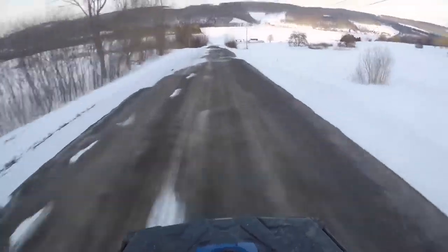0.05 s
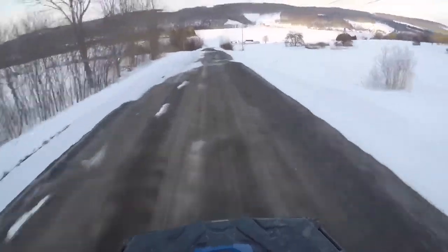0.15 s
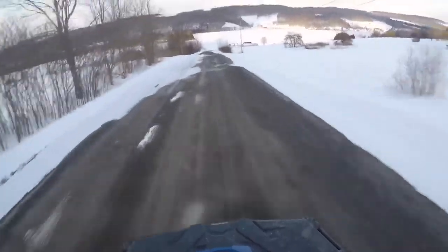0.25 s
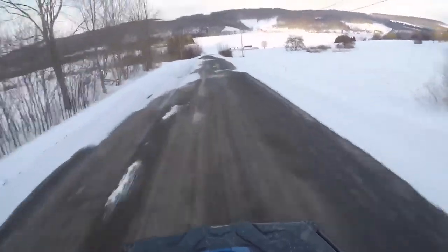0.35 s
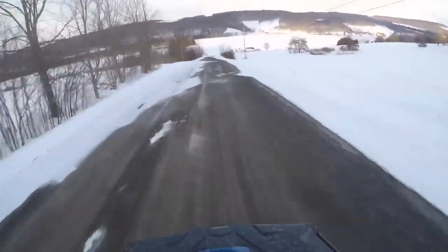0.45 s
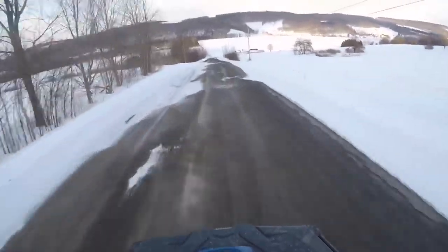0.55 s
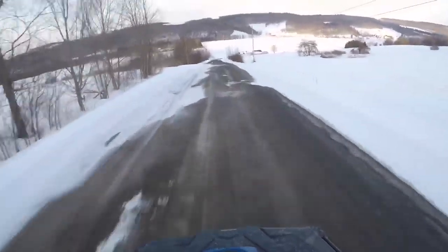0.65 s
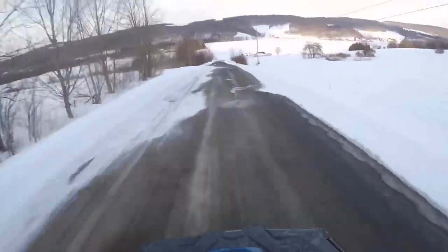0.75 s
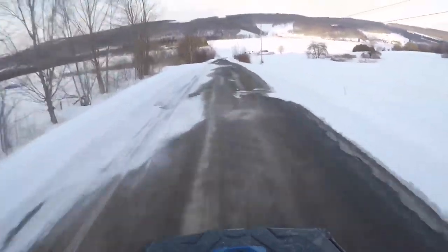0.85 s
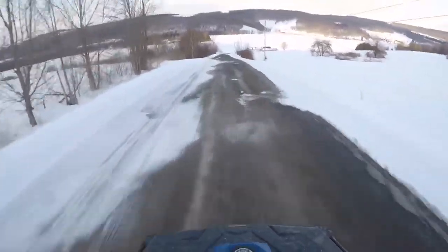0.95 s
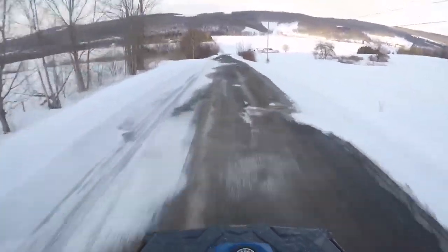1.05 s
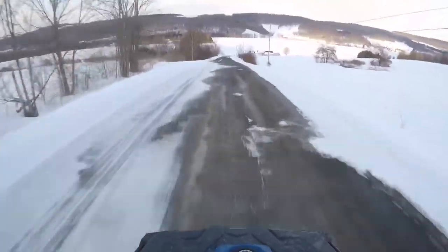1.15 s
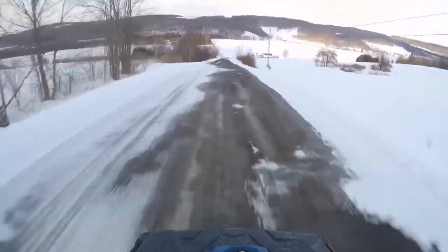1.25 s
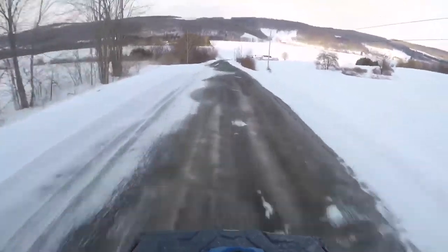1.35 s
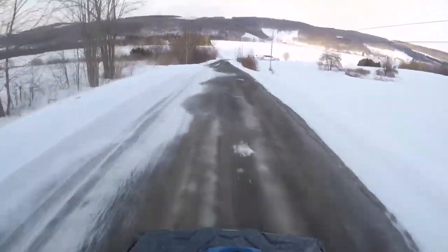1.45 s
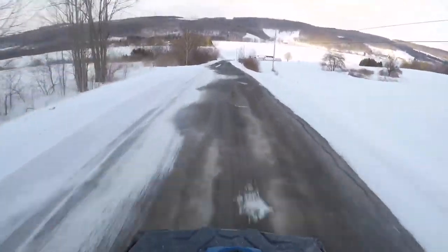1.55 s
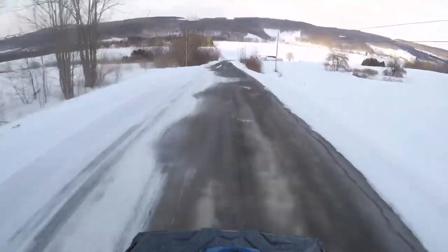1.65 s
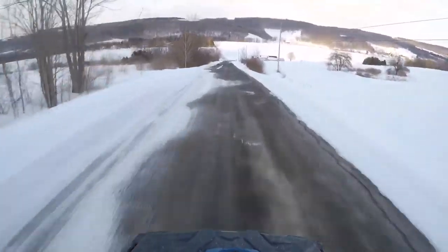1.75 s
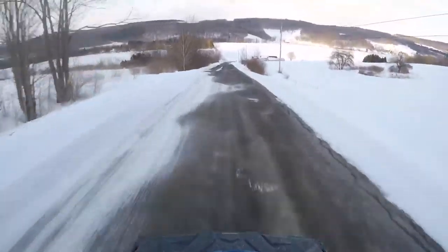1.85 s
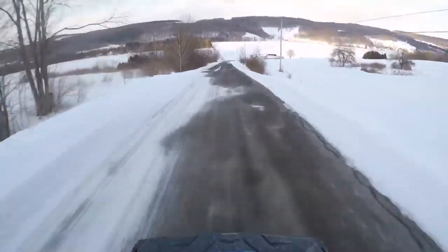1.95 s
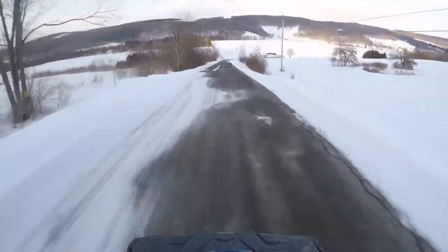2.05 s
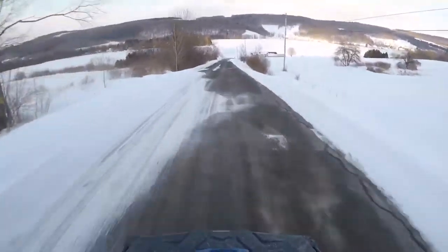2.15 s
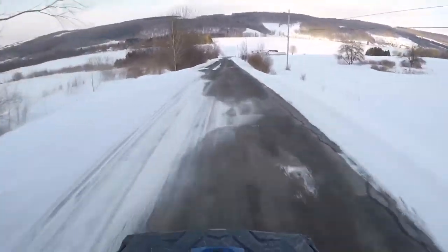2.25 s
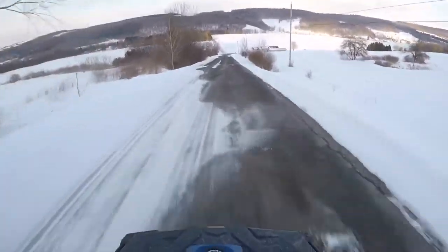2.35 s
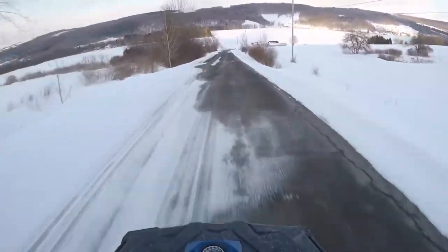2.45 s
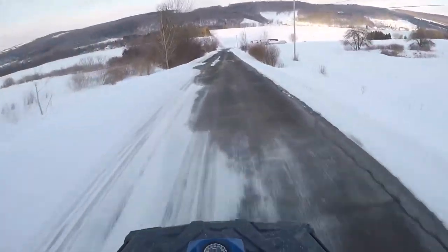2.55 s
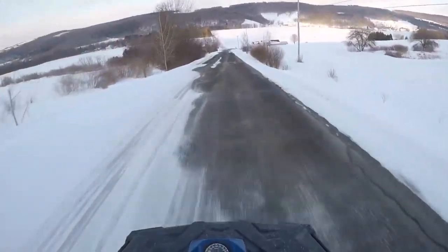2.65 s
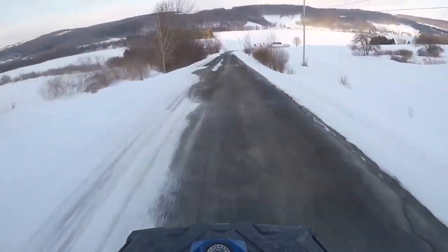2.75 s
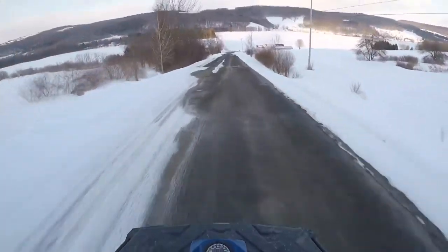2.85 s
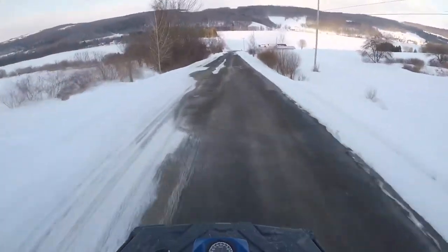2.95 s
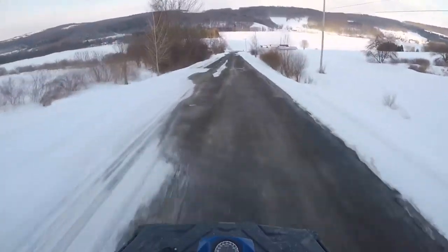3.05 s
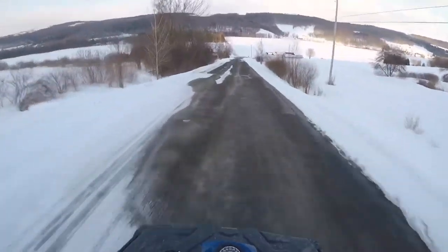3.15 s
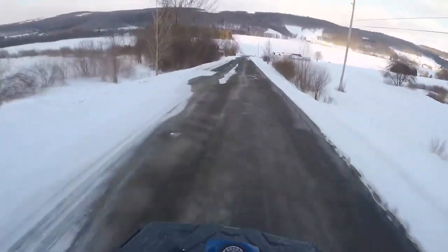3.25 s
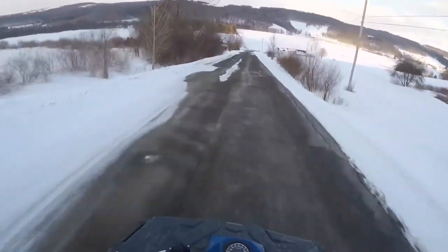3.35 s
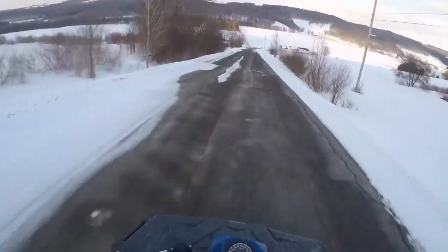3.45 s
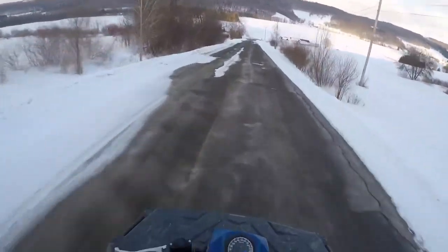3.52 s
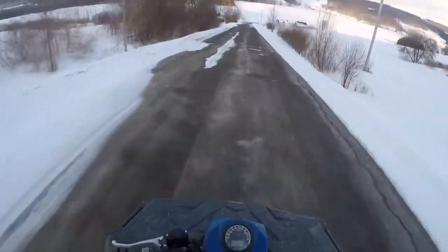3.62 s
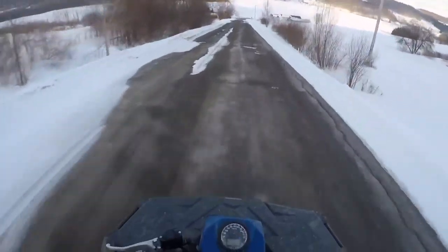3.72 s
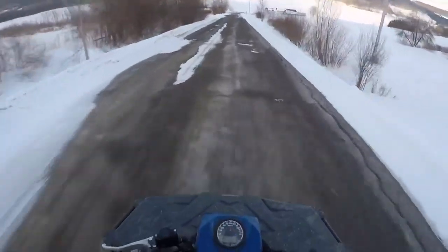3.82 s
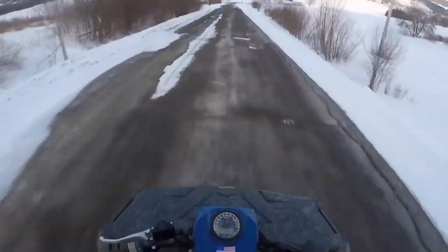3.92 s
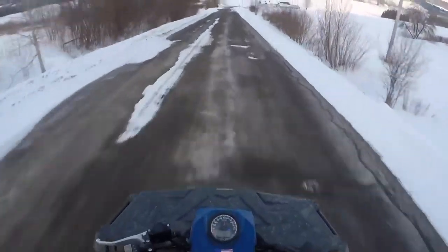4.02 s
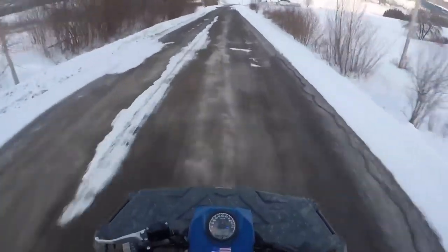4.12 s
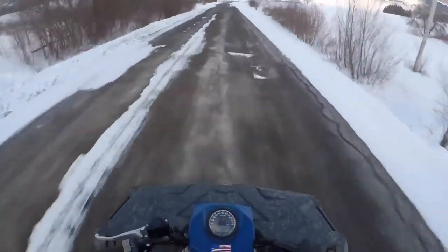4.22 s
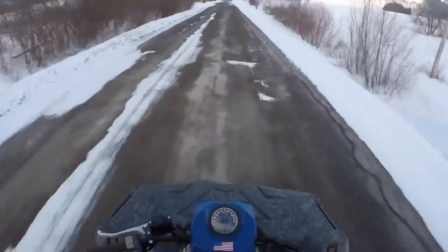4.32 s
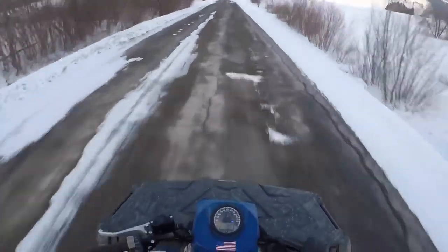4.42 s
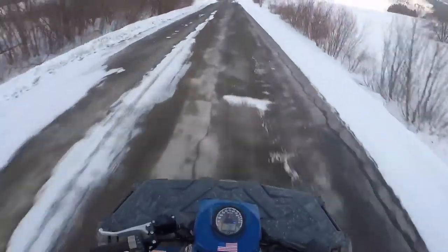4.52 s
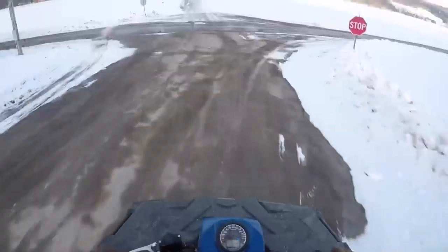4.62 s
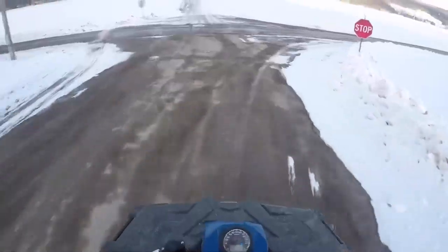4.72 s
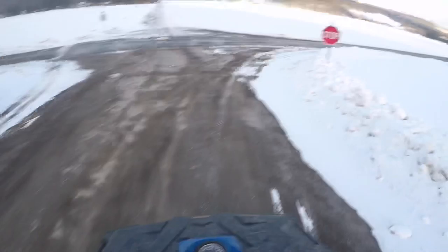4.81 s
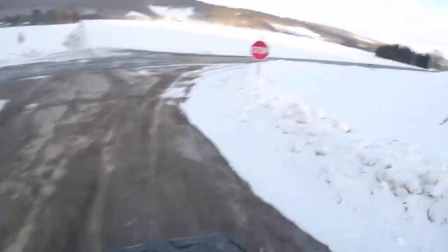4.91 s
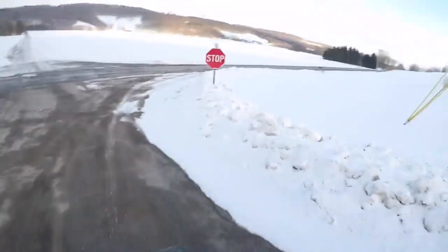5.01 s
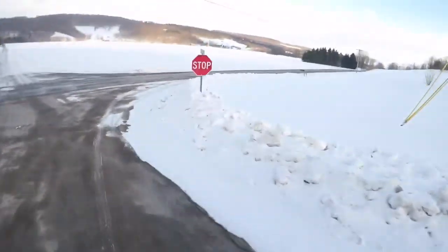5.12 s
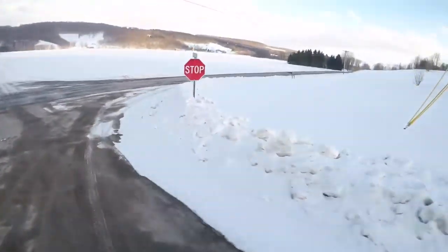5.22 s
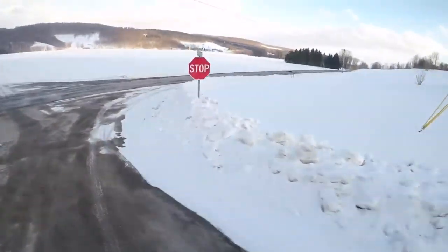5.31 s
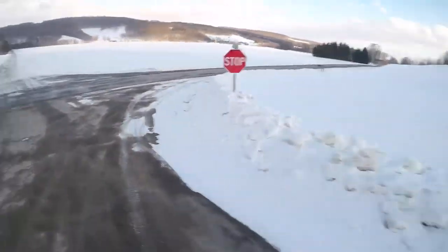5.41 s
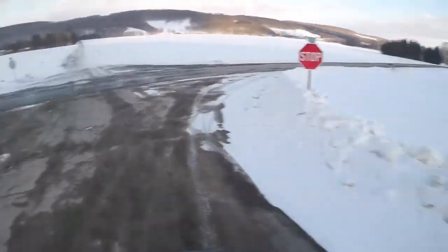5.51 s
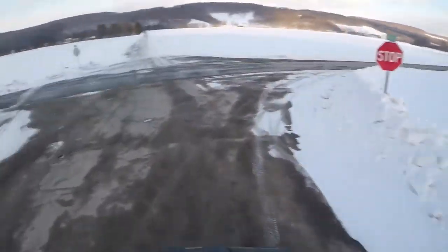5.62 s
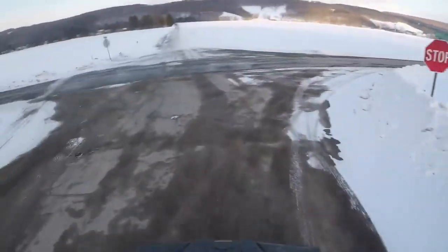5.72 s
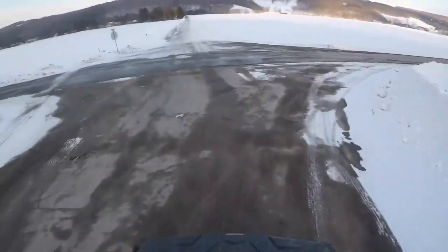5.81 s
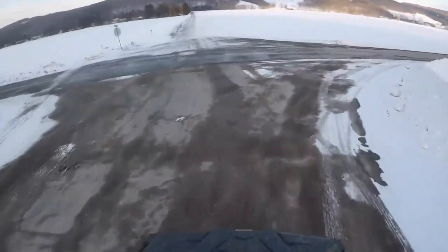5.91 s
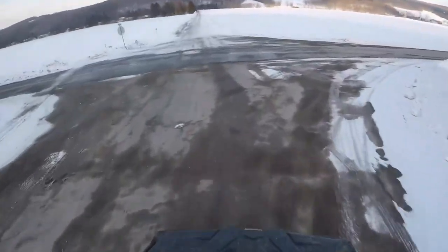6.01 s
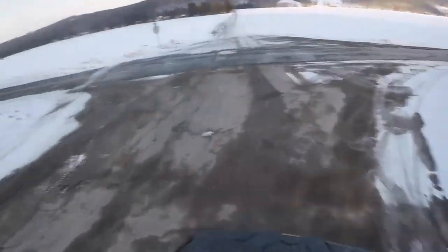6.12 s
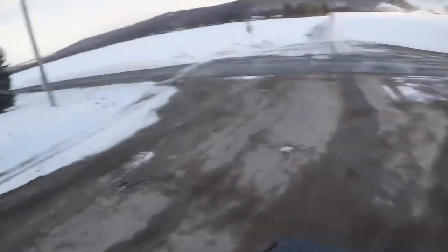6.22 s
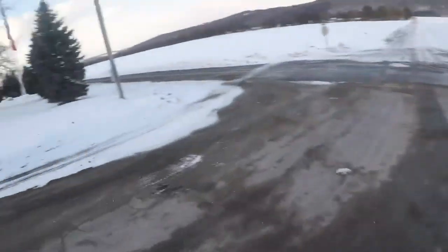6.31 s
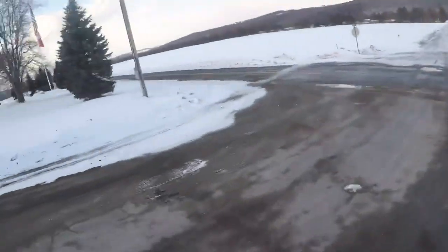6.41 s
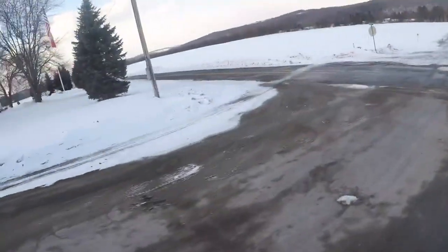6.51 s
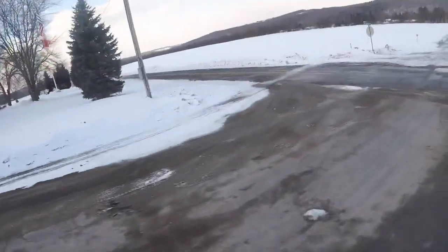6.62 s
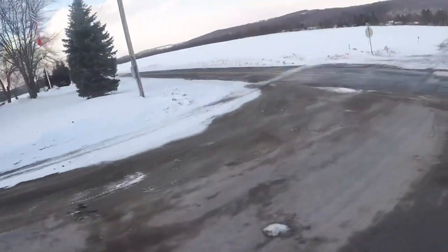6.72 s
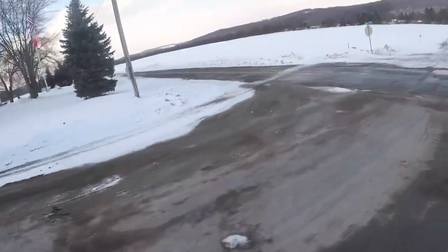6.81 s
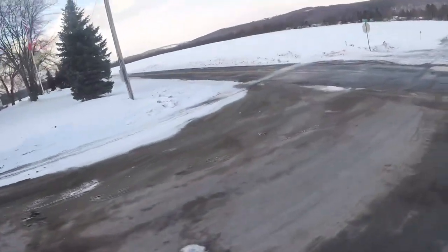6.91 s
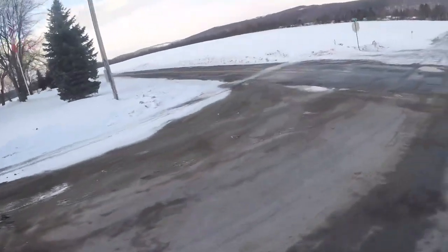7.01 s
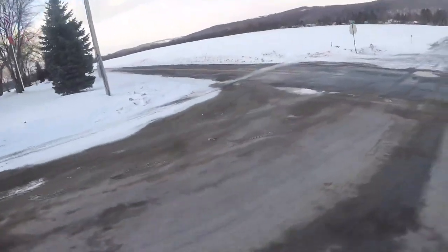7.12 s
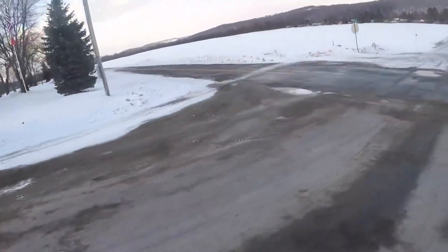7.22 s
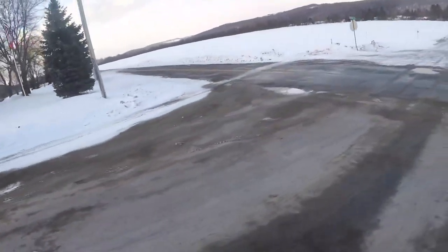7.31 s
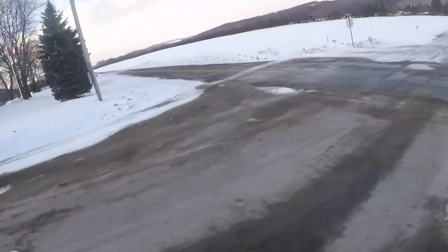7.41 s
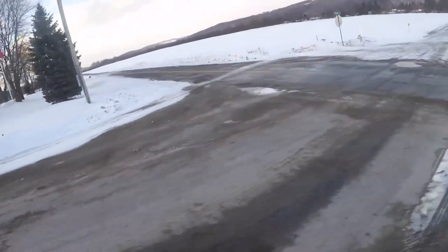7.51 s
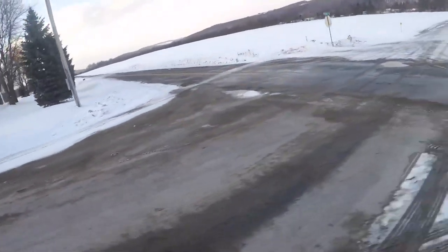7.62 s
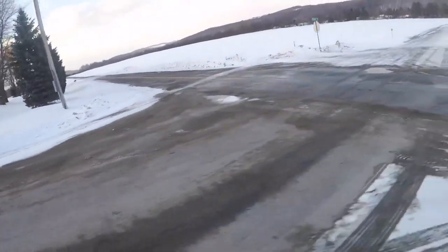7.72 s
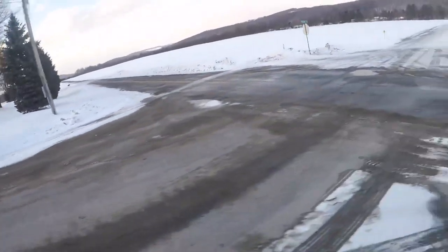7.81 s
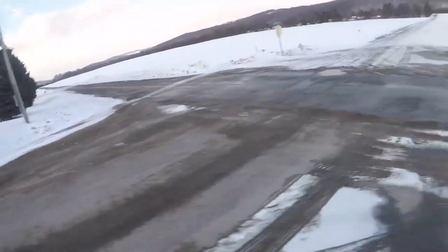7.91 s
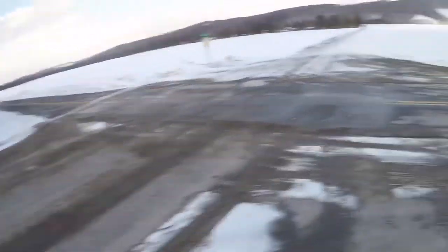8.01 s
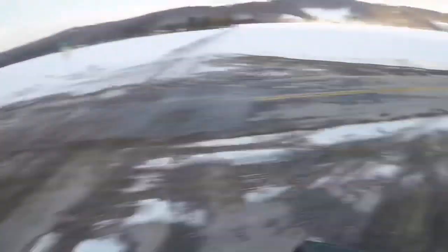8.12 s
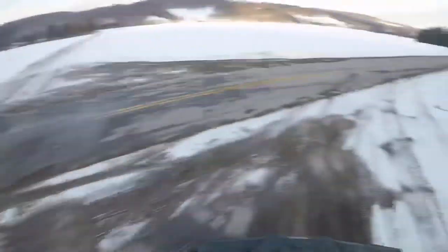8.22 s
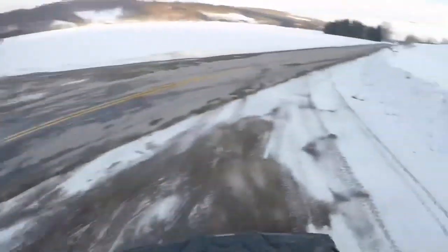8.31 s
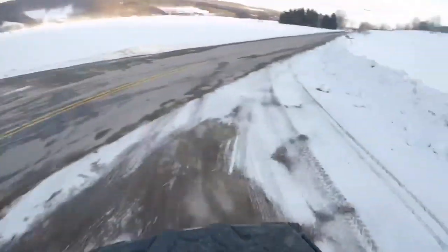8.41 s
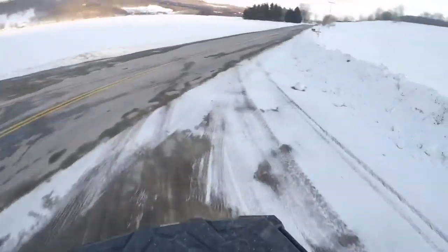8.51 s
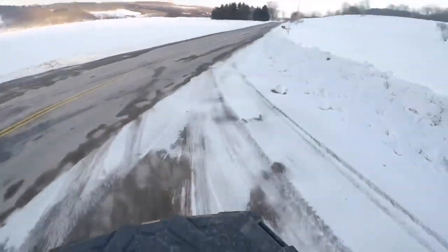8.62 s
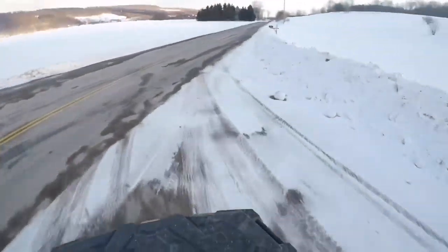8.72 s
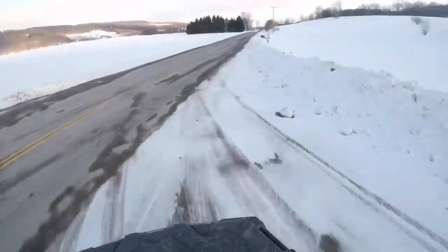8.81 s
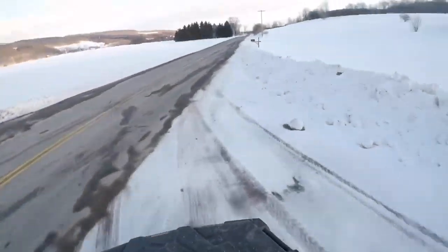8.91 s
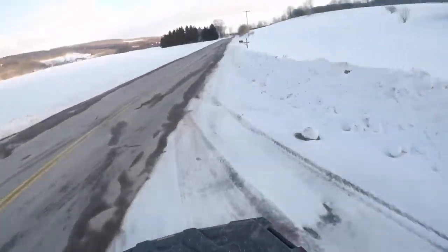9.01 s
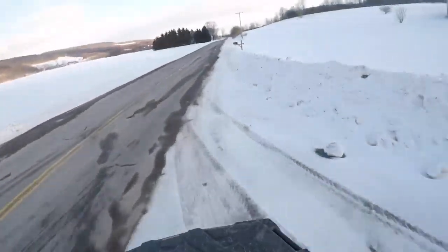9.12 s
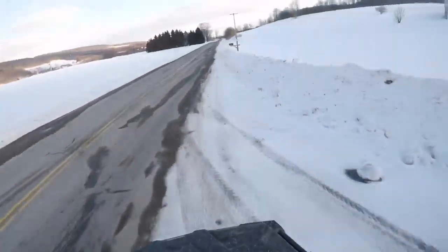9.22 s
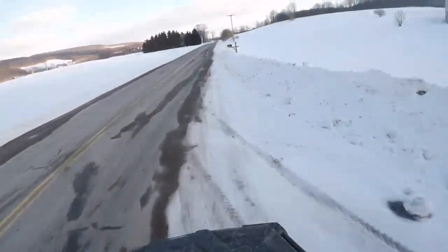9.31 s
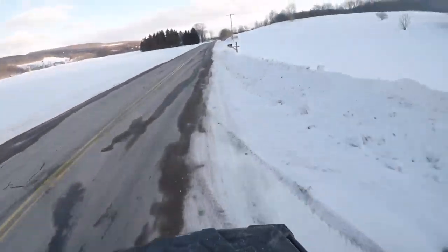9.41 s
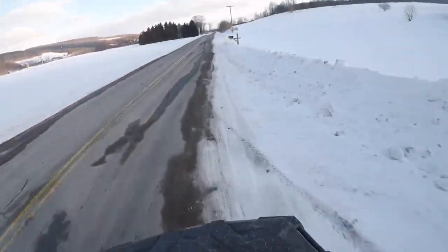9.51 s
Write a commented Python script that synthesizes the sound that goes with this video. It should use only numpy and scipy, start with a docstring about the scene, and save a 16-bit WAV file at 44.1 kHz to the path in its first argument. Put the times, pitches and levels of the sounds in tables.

```python
"""Quad bike on a wintry road.

At speed, turbulent air excites the resonances of a plastic camera housing that travels with the rider,
and its roar nearly masks the coasting single-cylinder engine. The scene then changes to a junction:
the quad rolls up, exhaust pulses ringing the pipe and valves ticking, and pulls away under throttle."""
import sys
import numpy as np
from scipy import signal
from scipy.fft import rfft, irfft
from scipy.io import wavfile
from scipy.ndimage import uniform_filter1d, map_coordinates

SR = 44100
rng = np.random.default_rng(int(sys.argv[2]) if len(sys.argv) > 2 else 0)


def to_wav(s):
    """Save 16-bit WAV."""
    ch = np.atleast_2d(s).T  # columns
    pcm = np.round(np.clip(ch, -1, 1) * 32767)  # PCM
    wavfile.write(sys.argv[1], SR, pcm.astype(np.int16))


N = 421155
TIME_S = np.arange(N) / SR


# strength of the airstream at speed: time_s, level_db
AIRSTREAM_LEVEL = [(0, -19.5), (0.3, -18.5), (1.15, -18), (2.15, -22), (2.8, -20.5), (3.35, -23),
                   (3.88, -24.5), (4.08, -22.5), (4.6, -26.5)]
# modes of the housing, its gaps, mount and wall, and the body panels: centre_hz, width_hz, gain_db
HOUSING_MODES = [(802.3, 47, -0.5), (836, 15, -2.5), (1112, 56, 2), (1248.6, 61, 5), (1291, 67, 3),
                 (1393, 63, -5), (1463, 50, -18)]
GAP_MODES = [(2290, 280, -2.5), (2715, 427, 4.5), (4330, 810, 2), (4893, 240, -2.5), (5590, 303, 3),
             (6240, 300, -27), (7330, 520, -6), (7710, 270, -27.5), (8420, 133, -9)]
MOUNT_MODES = [(78, 12.6, 6.5), (70, 14, 2.5)]
WALL_MODES = [(398, 20.5, 0)]
PANEL_MODES = [(168.2, 14, -1), (205.7, 28.5, -11.5), (305.3, 23, -10.5)]
# spectrum of the rushing air: frequency_hz, density_db
RUSH_SPECTRUM = [(12, -23), (30, 12), (55, 12.5), (110, -2.5), (250, -4.5), (500, -3), (700, 0), (950, -3),
                 (1600, 4), (1850, -24.5), (6000, -16), (9300, -28), (11000, -42.5), (15000, -51.5)]
# swells in which the housing wall drums: centre_s, half_length_s, level_db
WALL_SWELLS = [(1.64, 0.13, -32.5), (1.94, 0.05, -31.5), (2.36, 0.25, -37), (3.48, 0.27, -36.5)]

def airstream():
    """Broadband excitation: turbulence rings the housing, shakes its mount and hisses in its gaps."""
    wind_db = curves(AIRSTREAM_LEVEL)[0]
    eddies_db = 0.53 * wobble(23.87) + 0.5 * wobble(75)
    roar = amp(wind_db - 2.14 + eddies_db + 0.37 * wobble(26)) * resonate(noise(), HOUSING_MODES)
    hiss = amp(0.84 * wind_db - 13.5 + eddies_db) * resonate(noise(), GAP_MODES)
    hiss = filtered(hiss, lambda hz: 1 / np.sqrt(1 + (hz / 9700) ** 24))
    rush = amp(wind_db - 5 + eddies_db) * coloured(noise(), RUSH_SPECTRUM)
    drone = np.sin(2 * np.pi * np.cumsum(80.5 + 3 * wobble(14)) / SR)
    gust = swell(centre_s=0.92, half_length_s=0.26, level_db=-24)
    push = (amp(0.59 * wind_db - 12.5) + gust) * amp(1.26 * wobble(16))
    buffet = push * unit(drone + 0.66 * steady(resonate(noise(), MOUNT_MODES)))
    drumming = amp(wind_db - 20) + sum(swell(*row) for row in WALL_SWELLS)
    wall = drumming * steady(resonate(noise(), WALL_MODES))
    panels = amp(-32.5) * steady(resonate(noise(), PANEL_MODES))
    return roar + hiss + rush + buffet + wall + panels


# engine speed at the junction: time_s, firing_hz
JUNCTION_FIRING = [(4.66, 28.3), (5.08, 26.5), (5.24, 31.6), (5.4, 30.45), (6.3, 27.45), (6.6, 25.9),
                   (6.9, 23.45), (7.02, 24.0), (7.15, 31.4), (7.6, 36.1), (7.8, 38.9), (8.1, 40.2),
                   (8.35, 43.3), (8.8, 50.4), (9.18, 54.65), (9.25, 50.5), (9.43, 54.8), (9.55, 58.3)]

def engine():
    """Four-stroke cycle: one firing in two crank turns sets the period of every engine sound."""
    cycle = cycles(JUNCTION_FIRING)
    return exhaust(cycle) + piston(cycle) + crankcase(cycle) + valves(cycle) + intake(cycle)


def rev_gain(top_db, full_hz, db_per_hz):
    """Saturating gain: it grows with the firing rate and holds at top_db from full_hz upward."""
    return amp(top_db - db_per_hz * np.maximum(full_hz - curves(JUNCTION_FIRING)[0], 0))


# a blip, a roll, then pulling away with one short lift: time_s, open_fraction
THROTTLE_TRAVEL = [(5.08, 0), (5.16, .5), (5.3, .05), (7.02, 0), (7.1, 1), (9.18, 1), (9.26, .2),
                   (9.36, .35), (9.48, 1)]

def throttle():
    """Engine load follows the throttle opening, from 0 (shut) to 1 (wide open)."""
    return np.clip(curves(THROTTLE_TRAVEL)[0], 0, 1)


# air-column modes of the tailpipe: centre_hz, width_hz, gain_db
TAILPIPE_MODES = [(499, 35, 3.5), (556, 24, 5.5), (609, 16, 0), (707, 21, -0.5), (840, 40, -18)]

def exhaust(cycle):
    """Pulse excitation: firings chug in the silencer, boom under load at low revs and bark at high."""
    opening, firing_hz = throttle(), curves(JUNCTION_FIRING)[0]
    idle = amp(-34.5) * (30 / firing_hz) ** 2  # a shut throttle starves each firing as the revs rise
    load = opening * rev_gain(top_db=-32, full_hz=45.7, db_per_hz=1.4)
    chug = (idle + load) * silencer(cycle, opening)
    lugging = opening / (1 + np.exp(firing_hz - 40.4))  # dies away around 40 firings a second
    pipe_ring = resonate(impulses(cycle, 0, scatter_db=2.8), [(326.6, 22, 0)])
    boom = amp(-40.5) * lugging * steady(pipe_ring)
    blowdown = steady(impulses(cycle, 0, scatter_db=1))
    blowdown += 0.15 * unit(bursts(cycle, 0, decay=0.3) * noise())
    bark_band = signal.butter(3, [460, 700], "bandpass", fs=SR, output="sos")
    tailpipe_ring = steady(resonate(signal.sosfilt(bark_band, blowdown), TAILPIPE_MODES))
    bark = opening * rev_gain(top_db=-40.5, full_hz=45.6, db_per_hz=1) * tailpipe_ring
    return chug + boom + bark


# response of silencer and pipe: frequency_hz, shut_throttle_db, open_throttle_db
SILENCER_RESPONSE = [(15, -35, -28), (28, -1, -37), (52, -13.5, -1), (82, 3, 2.5), (116, -1, -5),
                     (136, -1.5, -0.5), (163, -18.5, -4.5), (184.5, -12, -2.5), (215, 1.5, 6.5),
                     (248.3, -5, 4.5), (265, -9.5, -4), (298, -12.5, -2), (328, -13.5, -8),
                     (382, -11.5, -15), (700, -32, -25.5)]

def silencer(cycle, opening):
    """Acoustic low-pass filter: the chambers muffle each puff and, under load, disperse it in time."""
    cutoff_hz, delay_s = 355, 0.01103  # group delay grows with frequency, reaching delay_s at cutoff
    puffs = impulses(cycle, 0, scatter_db=0.9)
    gulps = 0.2 * impulses(cycle, 0.5, scatter_db=2)  # one crank turn later
    muffled = signal.sosfilt(signal.butter(8, cutoff_hz, fs=SR, output="sos"), puffs + gulps)
    dispersed = filtered(
        muffled, lambda hz: np.exp(-1j * np.pi * delay_s * np.minimum(hz, 500) ** 2 / cutoff_hz))
    shut = coloured(muffled, [(hz, db) for hz, db, _ in SILENCER_RESPONSE])
    wide = coloured(dispersed, [(hz, db) for hz, _, db in SILENCER_RESPONSE])
    return (1 - opening) * shut + opening * wide


def piston(cycle):
    """Forced vibration: the piston shakes the frame at twice crank speed, fading with throttle."""
    peak_firing_hz, half_width_hz = 27.1, 3
    resonance = 1 / np.hypot(1, (curves(JUNCTION_FIRING)[0] - peak_firing_hz) / half_width_hz)
    shake = np.sqrt(2) * np.cos(2 * np.pi * 4 * cycle)
    return amp(-30.5 + 1.2 * wobble(25)) * resonance * (1 - throttle()) ** 2 * shake


# spectrum of the crankcase and gearbox: frequency_hz, density_db
CRANKCASE_SPECTRUM = [(100, -15), (400, -3), (520, -6), (900, -7), (1070, -1), (1400, -0.5), (1650, -10.5),
                      (1930, -16.5), (2150, -15), (2550, -19.5), (2850, -17), (3300, -27), (5000, -33),
                      (9000, -65)]

def crankcase(cycle):
    """Structure-borne noise: the cases radiate combustion and gear clatter, rising with load and revs."""
    pulsing = 1 + 0.2 * bursts(cycle, 0, decay=0.49) + 0.7 * bursts(cycle, 0.17, decay=0.35)
    slack = 0.003 * wobble(45)  # play in the gears and chain, in cycles
    rattle = pulsing * (noise() + 0.5 * periodic_noise(cycle + slack))
    level = amp(-45.5) + np.sqrt(throttle()) * rev_gain(top_db=-33.5, full_hz=53.9, db_per_hz=0.97)
    return level * coloured(rattle, CRANKCASE_SPECTRUM)


# strength of the valve ticks: time_s, level_db
VALVE_LEVEL = [(4.66, -63.5), (6, -68), (6.25, -58.5), (8, -60), (8.5, -64), (9.55, -55)]
# modes of the rocker cover: centre_hz, width_hz, gain_db
COVER_MODES = [(2920, 51, -2.5), (4305, 170, 3.5), (5540, 370, -9), (6570, 400, -5.5), (8750, 2200, -23)]

def valves(cycle):
    """Impact excitation: two valves tap shut in turn, one harder, and ring the rocker cover."""
    taps = bursts(cycle, 0.05, decay=0.16) + 0.45 * bursts(cycle, 0.55, decay=0.16) + 0.15
    impacts = taps * (noise() + periodic_noise(cycle))
    return amp(curves(VALVE_LEVEL)[0]) * resonate(impacts, COVER_MODES)


# modes of the airbox: centre_hz, width_hz, gain_db
AIRBOX_MODES = [(2150, 98, 2.5), (2810, 290, 4.5), (3600, 250, 1), (4340, 150, -1), (5480, 490, -19),
                (5930, 580, -2.5), (6580, 300, -10), (7460, 340, -8), (8700, 330, -15), (9000, 410, -15.5)]

def intake(cycle):
    """Cavity resonance: gasps of air excite the airbox, louder as the revs climb."""
    gasps = 1 + 0.4 * bursts(cycle, 0.055, decay=0.2) + 0.51 * bursts(cycle, 0.79, decay=0.2)
    draw = amp(-63.5) + rev_gain(top_db=-47, full_hz=46.8, db_per_hz=1.7)
    return draw * resonate(gasps * noise(), AIRBOX_MODES)


# engine speed while coasting: time_s, firing_hz
COASTING_FIRING = [(0, 37), (2, 33.7), (4.6, 31.4)]

def coasting_engine():
    """Masking: with the throttle shut, exhaust and piston drone almost hidden under the wind."""
    cycle = cycles(COASTING_FIRING)
    shake = np.sin(2 * np.pi * 4 * cycle)
    return amp(-42.5) * silencer(cycle, opening=0) + amp(-37) * shake


def hum():
    """Harmonic partials: the second and third of an absent fundamental swell briefly and fade."""
    fundamental_hz = 184
    phase = 2 * np.pi * fundamental_hz * TIME_S
    partials = np.sin(2 * phase) + np.sin(3 * phase)
    return swell(centre_s=0.18, half_length_s=0.097, level_db=-32.5) * partials


def gears():
    """Gear-mesh tones: a gear whine with a sideband just above it sounds for a moment, falling in pitch as the
    quad slows."""
    centre_s, fall_hz_per_s, sideband_ratio = 5.72, 180, 1.107
    pitch_hz = 1127 - fall_hz_per_s * (TIME_S - centre_s)
    phase = 2 * np.pi * np.cumsum(pitch_hz * (1 + 0.004 * wobble(40))) / SR
    lower = amp(2.5 * wobble(25)) * np.sin(phase) + amp(-15) * np.sin(2 * phase)
    upper = amp(-4 + 2.5 * wobble(25)) * np.sin(sideband_ratio * phase)
    return swell(centre_s, half_length_s=0.27, level_db=-46.5) * (lower + upper)


# rough patches of road: centre_s, half_length_s, level_db
ROUGH_PATCHES = [(5.16, 0.12, -37), (6.25, 0.18, -37), (6.92, 0.12, -45), (9.3, 0.14, -32)]
# spectra of the chassis rumble and the even background hiss: frequency_hz, density_db
CHASSIS_SPECTRUM = [(10, -14), (20, -2), (45, 0), (75, -1), (130, -10), (230, -12), (330, -16), (450, -27),
                    (800, -38), (2000, -70)]
HISS_SPECTRUM = [(1500, 5.5), (3000, -5), (5000, -0.5), (7000, -0.5), (9400, -0.5), (11000, -8),
                 (13000, -11), (15000, -28)]

def rolling():
    """Random excitation: the road shakes the chassis and wind builds in the housing, over faint hiss."""
    roughness = amp(-37) + sum(swell(*row) for row in ROUGH_PATCHES)
    rumble = roughness * steady(coloured(noise(), CHASSIS_SPECTRUM))
    breeze = rev_gain(top_db=-40, full_hz=49.5, db_per_hz=1) * resonate(noise(), HOUSING_MODES)
    return rumble + breeze + amp(-58) * coloured(noise(), HISS_SPECTRUM)


def cycles(firing_table):
    """Phase as the integral of frequency: engine cycles elapsed at each sample."""
    return np.cumsum(curves(firing_table)[0]) / SR


def impulses(cycle, offset, scatter_db):
    """Impulse train: one pulse of random size at the same point of every cycle."""
    onsets = np.flatnonzero(np.diff(np.floor(cycle - offset)) > 0)
    sizes = amp(scatter_db * rng.standard_normal(1000)[:len(onsets)])
    return np.bincount(onsets, sizes, N)


def bursts(cycle, offset, decay):
    """Exponential decay restarted once a cycle; offset and decay are fractions of the cycle."""
    return np.exp(-((cycle - offset) % 1) / decay)


def periodic_noise(cycle):
    """Periodic excitation: one random pattern of small impacts recurs in every engine cycle."""
    pattern = rng.standard_normal(400)
    return unit(map_coordinates(pattern, [cycle % 1 * len(pattern)], mode="grid-wrap"))


def noise():
    """Gaussian white noise."""
    return rng.standard_normal(N)


def wobble(rate_hz):
    """Random modulation: a smooth curve through rate_hz random values a second."""
    return map_coordinates(rng.standard_normal(4000), [TIME_S * rate_hz], mode="mirror")


def swell(centre_s, half_length_s, level_db):
    """Gaussian envelope peaking at level_db."""
    return amp(level_db) * np.exp(-((TIME_S - centre_s) / half_length_s) ** 2)


def curves(rows):
    """Linear interpolation: one value per sample for each column after the time."""
    times_s, *columns = np.transpose(rows)
    return [np.interp(TIME_S, times_s, column) for column in columns]


def resonate(x, modes):
    """Modal superposition: x through parallel resonances, each applied twice, scaled to rms 1."""
    def response(hz):
        return sum(amp(db) * (2j * hz * width / (centre ** 2 - hz ** 2 + 2j * hz * width)) ** 2
                   for centre, width, db in modes)
    return unit(filtered(x, response))


def coloured(x, spectrum):
    """Minimum-phase filtering: x shaped by a (frequency_hz, gain_db) outline, scaled to rms 1."""
    def response(hz):
        outline_hz, outline_db = np.transpose(spectrum)
        gain = amp(np.interp(np.log(hz + 1), np.log(outline_hz), outline_db))
        cepstrum = irfft(np.log(gain))
        cepstrum[1:len(cepstrum) // 2] *= 2  # folding the cepstrum makes the filter causal
        cepstrum[len(cepstrum) // 2 + 1:] = 0
        return np.exp(rfft(cepstrum))
    return unit(filtered(x, response))


def filtered(x, response):
    """Convolution: x through a filter with the given complex frequency response."""
    kernel = np.fft.fftshift(irfft(response(np.fft.rfftfreq(32768, 1 / SR))))
    return signal.oaconvolve(x, kernel)[len(kernel) // 2:][:N]


def amp(db):
    """Decibels to amplitude ratio."""
    return 10 ** (np.asarray(db) / 20)


def unit(x):
    """Normalisation to an overall rms of 1."""
    return x / np.sqrt(np.mean(x ** 2) + 1e-20)


def steady(x):
    """Normalisation to a running rms of 1."""
    power = uniform_filter1d(uniform_filter1d(x ** 2, size=8000), size=8000)
    return x / np.sqrt(np.abs(power) + 1e-6 * np.mean(x ** 2))


def scene():
    """Superposition: the sources add in two scenes, the fast stretch and then the junction."""
    change_s = 4.636
    fast_stretch = airstream() + coasting_engine() + hum()
    junction = engine() + gears() + rolling()
    fade_out = np.clip((change_s - TIME_S) / 0.025, 0, 1) ** 2
    fade_in = np.clip((TIME_S - change_s) / 0.023, 0, 1)
    return (fast_stretch * fade_out + junction * fade_in)[None]


def record(dry):
    """Band limiting: a steep low-pass filter removes the highest treble."""
    return filtered(dry[0], lambda hz: hz < 15100)[None]


dry = scene()
out = record(dry)
to_wav(out)
```